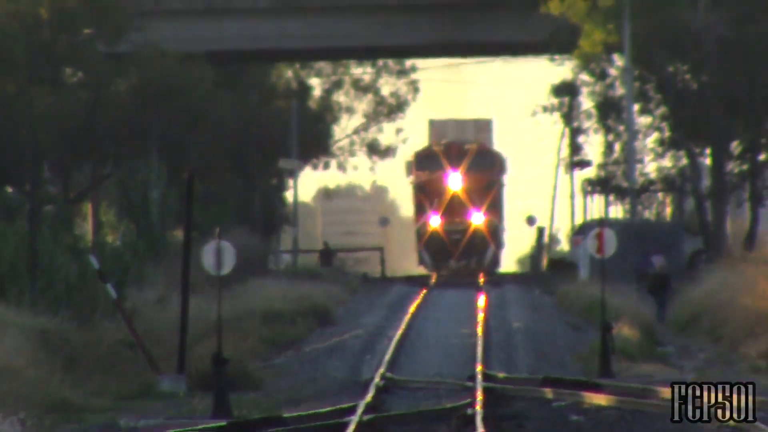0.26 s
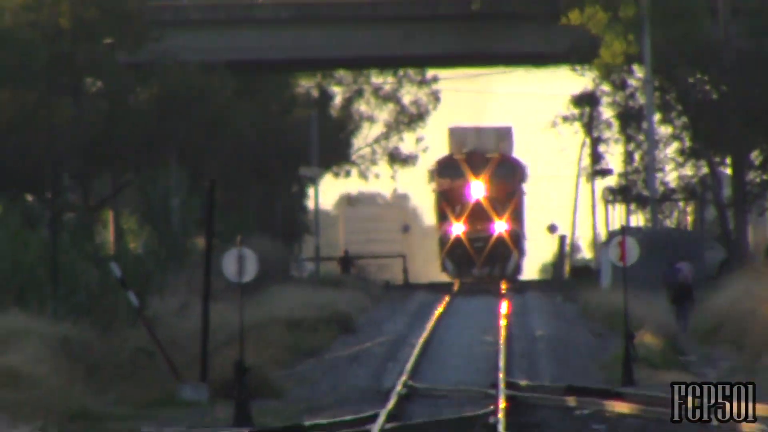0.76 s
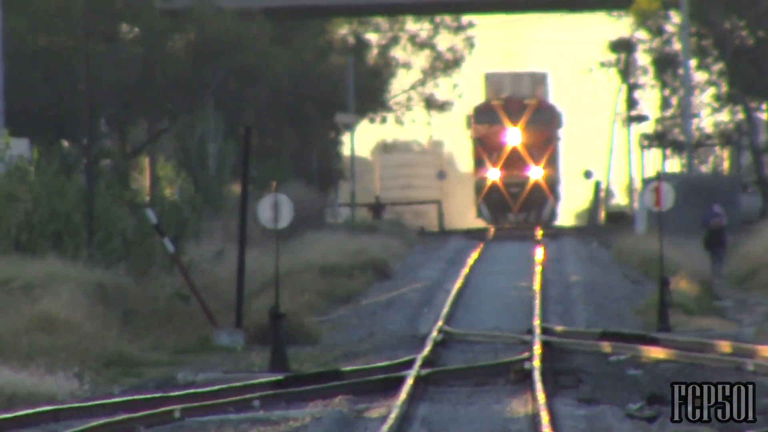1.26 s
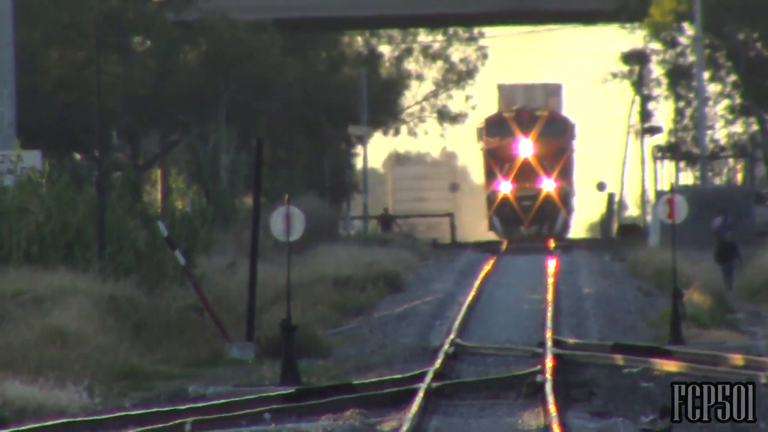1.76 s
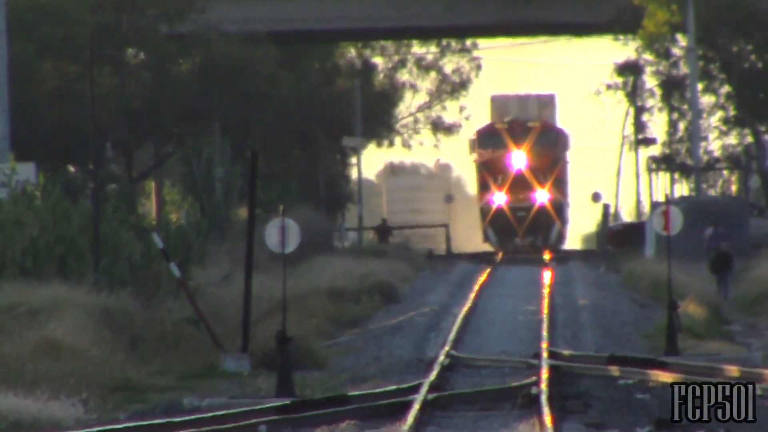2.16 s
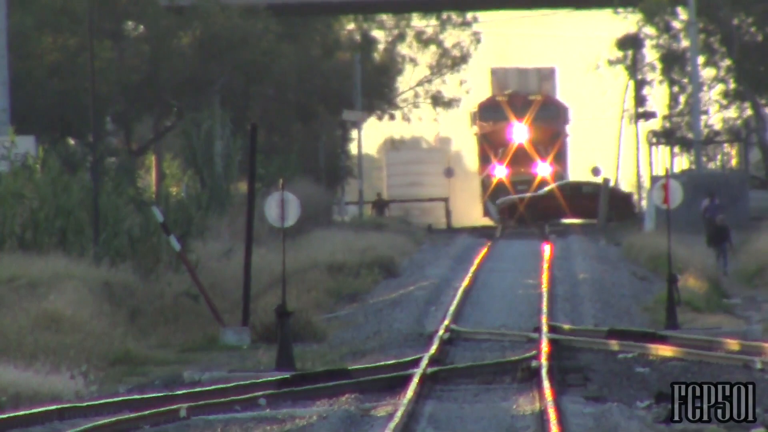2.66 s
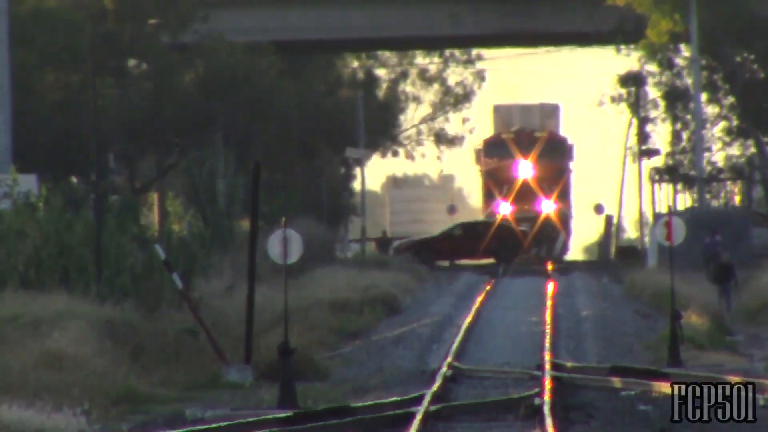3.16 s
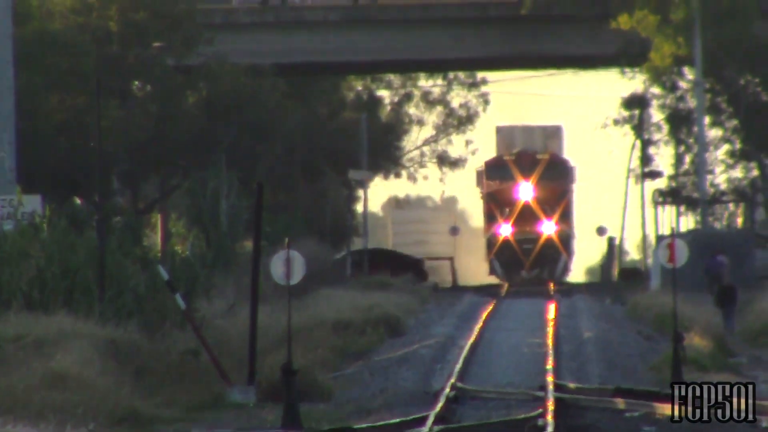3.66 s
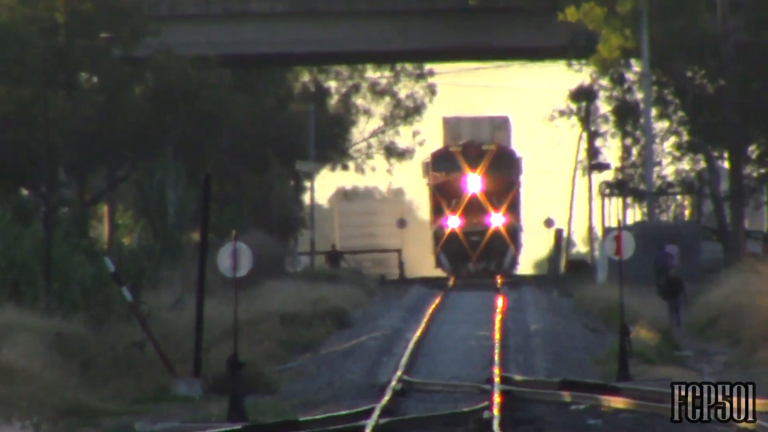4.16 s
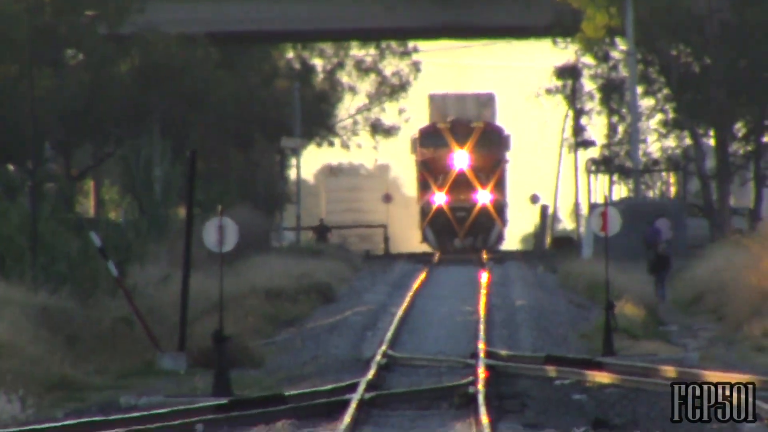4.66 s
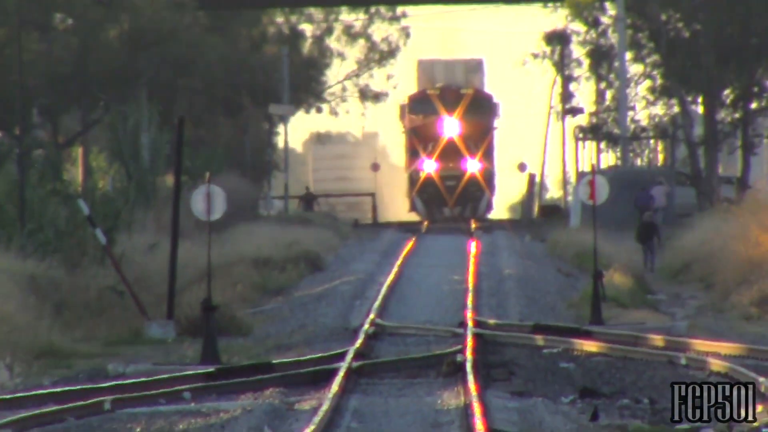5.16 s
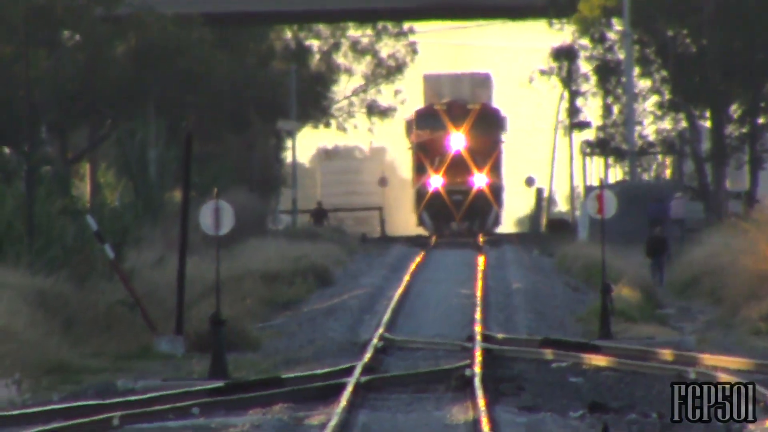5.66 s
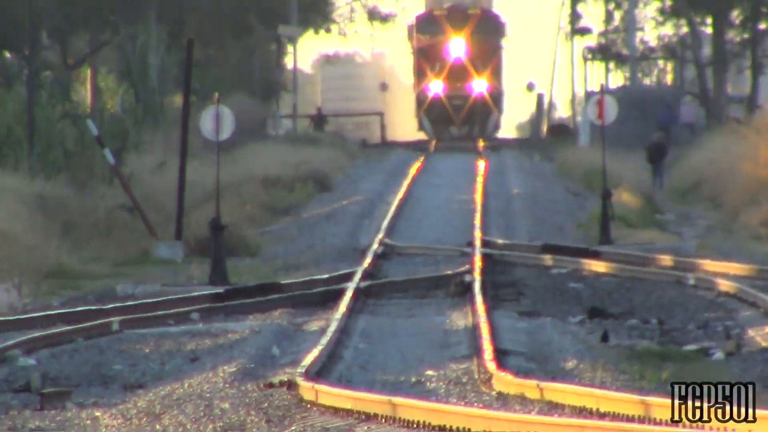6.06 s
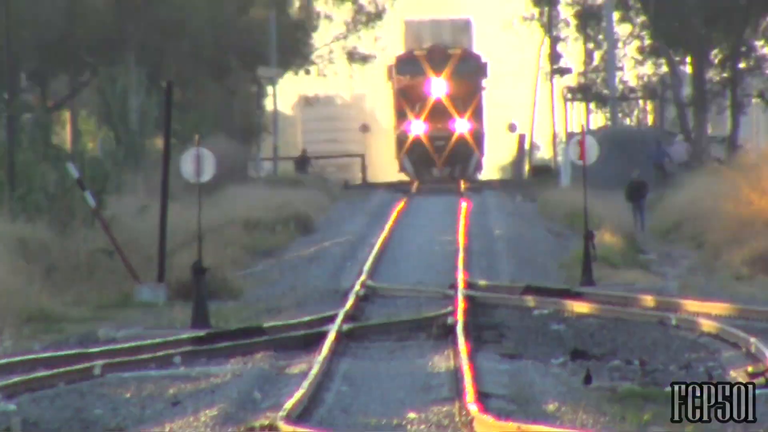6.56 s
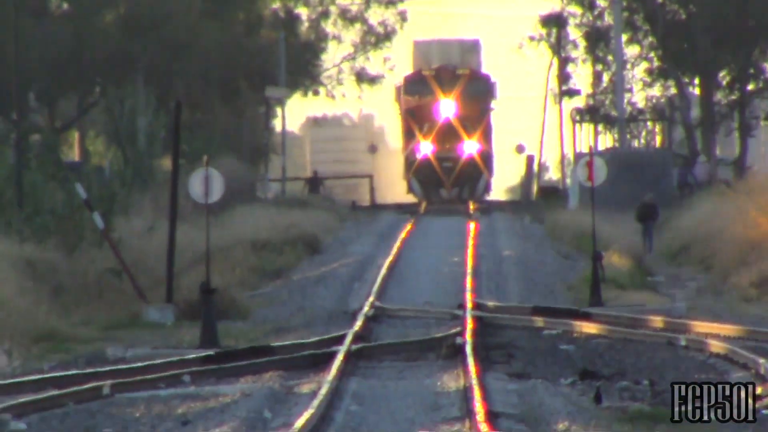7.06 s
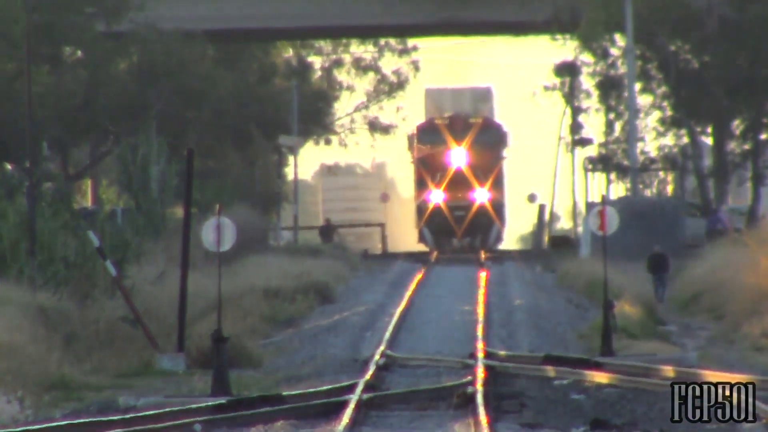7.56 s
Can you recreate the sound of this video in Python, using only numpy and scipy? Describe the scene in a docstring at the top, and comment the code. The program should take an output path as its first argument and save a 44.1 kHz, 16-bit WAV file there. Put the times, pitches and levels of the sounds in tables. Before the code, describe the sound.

A distant diesel locomotive holds a loud five-note air horn chord throughout, sagging and recovering three times, over faint rumble as a car thuds across.

```python
"""A distant diesel locomotive sounds a five-chime air horn; three times the valve eases and the chord sags.
The horn adds up the harmonics of five bells, with side tones, an air blast and a rasp around them.
Its partials fade in and out on their way over ballast and through trees, and trail a diffuse tail.
The diesel is a low noise with an unsteady exhaust note; a car is a climbing engine note and a thud.
The camera adds faint noise: a hiss with a trace of buzz, and small handling ticks."""
import sys
import numpy as np
from scipy import signal
from scipy.fft import rfft, irfft, next_fast_len
from scipy.io import wavfile
from scipy.ndimage import uniform_filter1d, minimum_filter1d, map_coordinates

SR = 44100
rng = np.random.default_rng(int(sys.argv[2]) if len(sys.argv) > 2 else 0)


def master(y):
    """Save y as 16-bit WAV."""
    cut = np.clip(np.atleast_2d(y).T, -1, 1)
    pcm = np.round(cut * 32767)  # scale
    wavfile.write(sys.argv[1], SR, pcm.astype(np.int16))


N = 344421
TIME = np.arange(N) / SR  # seconds
SLOW = np.linspace(0, N / SR, 1600)  # coarser time grid for slow changes, seconds

# The five bells of the horn. Each row: pitch in Hz, list of basic levels in dB of harmonics 1, 2, ..
BELLS = [(277.3, [-32.5, -33.5, -45, -32.5, -43, -53, -43, -48.5, -56, -61.5]),
         (324.3, [-29, -28.5, -27, -32.5, -51.5, -45, -63.5, -52, -54, -69]),
         (385.0, [-25, -12.5, -30, -37.5, -38, -45.5, -54.5, -56, -62.5, -75]),
         (492.5, [-29, -29.5, -48, -41.5, -51, -63.5, -66.5]),
         (528.2, [-23, -54, -32.5, -50.5, -63.5, -71.5])]
# How each bell's pitch bends. One number a bell: relative pitch change at full sag.
BENDS = [-.006, -.009, -.007, -.005, .029]
# The driver eases the valve. Each row: time of lowest pressure in seconds, sag of pressure from 0 to 1,
# loss in dB, closing time in seconds, reopening time in seconds.
EASES = [(1.659, 0.98, 11.5, .33, 0.1), (5.502, 0.95, 7, .23, .14), (6.179, .68, 6.5, .16, .16)]
SETTLE_S = 0.18  # the pitch comes back at its own pace after the valve reopens
STARVED_HZ = 1300
WASH_LOSS = 0.21  # share of the loss that side tones and air blast take

# The sound carries unevenly through the trees, so three ranges of pitch rise and fall.
# Each row: time in seconds, level change in dB.
MIDDLE = [(0, -4.0), (1.1, -2), (1.7, -5), (2.6, -3.5), (3.15, -1), (3.4, -5.0), (4.6, -6), (5.5, -1.5),
          (6.1, 0.0), (6.5, -1), (7.81, -5)]
TREBLE = [(0, -4.5), (0.7, -3.5), (1.3, -6), (2.3, -4), (3.1, -5.5), (3.4, -6), (4.6, -9.5), (5, -1.5),
          (5.5, -4), (6.6, -1.5), (7.4, -1), (7.81, 1.5)]
TOP = [(0, -3), (1.2, -3.5), (2, -5.0), (3.1, -5), (3.4, -4), (4.6, -1.5), (5.2, -4), (5.9, -1.5), (6.4, 2),
       (7, 0.0), (7.81, -9.5)]
MIDDLE_EDGE_HZ, TREBLE_EDGE_HZ = 1500, 2850  # middle gives way to treble, treble to top

# Some partials follow a level of their own instead. Each row: time in seconds, level change in dB.
# The dominant partial, near 770 Hz: the ground reflection swells and cancels it.
LEAD = [(0.0, 0.5), (0.75, -8), (0.85, -19), (0.95, -11), (1.25, -2.5), (1.65, -13.0), (1.75, -4.0),
        (1.95, 1.5), (2.75, 3.5), (2.95, 0.5), (3.15, 3.5), (3.35, -5), (5.15, 2.5), (5.25, -2.0),
        (5.95, -1.5), (6.55, 3), (7.81, -2.5)]
# Fundamentals of the first and third bell, then of the second, fourth and fifth; columns as above.
BASS = [(0, -8.5), (0.8, -5), (2.8, -8.5), (4.4, -8), (6.1, 0.5), (7.81, -5.5)]
SECOND = [(0.0, 0.5), (1.65, -4), (2.55, 0), (3.35, -11.5), (7.05, -0.5), (7.81, -3)]
FOURTH = [(0, -0.5), (1.3, 5), (1.6, -6.5), (4.6, -10.5), (5.1, 2), (5.9, -4), (6.25, -4.5), (6.7, 2.0),
          (7.3, 7), (7.81, 2.5)]
FIFTH = [(0.0, -11.5), (1.05, -2.5), (2.05, 2), (4.35, -3), (6.05, 7), (6.45, 3.5), (6.75, -11.5),
         (7.25, -13), (7.81, -5)]
# The beating pair near 980 Hz, the pair near 1130 Hz, the cluster near 1560 Hz and the partial
# near 1925 Hz; columns as above.
BEAT = [(0, -21), (0.4, -4.5), (1.2, -3.5), (2.1, -11.5), (2.6, 1.5), (4.7, -4.5), (5.8, 3.0), (6.95, 5),
        (7.35, -8), (7.81, 2.5)]
PAIR = [(0, -10.5), (2, -9), (3.3, -5), (5.3, -2), (5.7, 2.5), (6.5, 3.0), (6.9, -3.5), (7.81, -3.0)]
BLARE = [(0.0, 4.5), (1.85, -12), (2.65, -0.5), (3.35, -4), (3.85, 1.5), (4.65, -8), (5.35, 4),
         (5.65, -2.0), (6.45, -1), (7.81, 10.5)]
RING = [(0, 0.5), (0.6, -10), (0.9, 3.5), (1.4, -6.5), (2.2, 0), (3.2, -5), (4.5, -4), (5.1, 2.5),
        (6.55, -9.5), (7, 10.5), (7.25, -8.5), (7.81, 3)]
# Which partial takes which level. Each key: bell counted from 0, harmonic.
OWN_LEVEL = {(2, 2): LEAD, (0, 1): BASS, (2, 1): BASS, (1, 1): SECOND, (3, 1): FOURTH, (4, 1): FIFTH,
             (1, 3): BEAT, (3, 2): BEAT, (0, 4): PAIR, (2, 3): PAIR, (2, 4): BLARE, (4, 3): BLARE,
             (2, 5): RING}
# Single overtones ring out for a moment. Each row: bell counted from 0, harmonic, time of the crest
# in seconds, half length in seconds, lift in dB.
SWELLS = [(2, 7, 0.091, 0.15, 12.5), (1, 4, .8, 0.19, 6), (2, 8, 1.0, 0.44, 10.5), (2, 8, 2.7, 0.53, 5.5),
          (2, 9, 5.3, .1, 15.5), (2, 6, 5.85, 0.21, 11.5), (2, 7, 6.05, 0.13, 10), (2, 9, 6.35, .12, 6.5),
          (1, 4, 6.35, .12, 3), (2, 8, 6.38, 0.15, 8.5), (2, 8, 7.65, 0.32, 8.5)]

# Bells on one air manifold modulate each other and so sound sum and difference tones.
# Each row: pitch in Hz, relative level in dB.
SIDE_TONES = [(479, -41), (510, -38.5), (586, -36.5), (601, -38), (626, -35.5), (640, -35.5), (708, -46),
              (742, -37.5), (803, -37.5), (819, -37.5), (857, -35.5), (870, -41.5), (885, -59.5),
              (913, -45.5), (938, -36.5), (951, -36), (1020, -41), (1093, -41), (1178, -44.5),
              (1419, -61.5), (1684, -57)]
# Colour of the air blast. Each row: frequency in Hz, relative level in dB per Hz.
AIR = [(200, -43.5), (270, -5.5), (430, -12), (520, -4.5), (620, -5.5), (690, -3), (800, 9.5), (945, -4.5),
       (1010, -2.5), (1250, -12), (1600, -37.5)]
# Colour of the rasp. Each row: frequency in Hz, relative level in dB per Hz.
RASP = [(900, -31), (1300, 2), (1600, 3.5), (1800, -4), (2150, -4), (2600, -13), (3100, -17.5),
        (3600, -21.5), (4300, -33.5), (6000, -55.5)]
SIDE_TONES_DB, AIR_DB, RASP_DB = 3.5, -25, -29  # mix of the wash before slow changes

# Colour of the diesel rumble. Each row: frequency in Hz, relative level in dB per Hz.
RUMBLE = [(20, -9), (45, -8), (75, -3), (120, 1.5), (220, 3), (400, 0), (900, -27)]
# Rumble and hiss sink together for a while. Each row: time in seconds, level change in dB.
BACKGROUND = [(0.0, 1.5), (1.05, 1.5), (3.05, 2.5), (3.35, -1.5), (4.65, -3.5), (5.45, 2), (7.81, 2)]
RUMBLE_DB, NOTE_DB, HISS_DB = -41, -48.5, -63.5  # levels before slow changes
NOTE_FALL_DB_PER_S = 0.6  # the exhaust note slowly sinks into the rumble

# The car's engine. Each row: time in seconds, firing rate in Hz, level in dB.
CAR = [(2.2, 60.9, -48.5), (2.6, 67.46, -37.5), (3.0, 69.57, -33.5), (3.4, 72.46, -33.5), (3.8, 76.1, -33),
       (4.2, 73, -50.5)]
# Harmonics of the firing rate that sound. Each row: multiple of the rate, relative level in dB.
CAR_ORDERS = [(3, -9.5), (4, -2), (5, 2), (6, -8)]
# Colour of the wheel thud. Each row: frequency in Hz, relative level in dB per Hz.
THUD = [(45, -4.5), (80, 6.0), (230, 17), (400, -12.5)]

# Colour of the camera's hiss. Each row: frequency in Hz, relative level in dB per Hz.
HISS = [(1500, -14.5), (4000, 1), (6500, -4), (8500, -6.5), (11000, -12), (15500, -22.5)]
# Handling ticks. Each row: start in seconds, level in dB, time to die away by 60 dB in seconds.
TICKS = [(0.0861, -44, .035), (1.5107, -47.5, .1), (1.541, -49, 0.07), (1.6908, -49, 0.087),
         (2.0893, -41, .07), (2.1078, -46, 0.051), (2.2694, -46, 0.034), (2.9101, -41, 0.022),
         (2.954, -53.5, 0.066), (3.9405, -36, 0.0047), (4.7247, -45.5, 0.008), (4.7574, -44, .007)]
# Colour of the ticks. Each row: frequency in Hz, relative level in dB per Hz.
TICK_COLOUR = [(1500, -8.5), (3500, 7), (8000, -6.5), (10500, -20), (16000, -23)]
TOP_HZ = 15700  # the camera's band limit


def amp(db):
    """Turn decibels into a gain."""
    return 10 ** (np.asarray(db) / 20)


def unit(x):
    """Scale to an average strength (rms) of 1."""
    return x / np.sqrt(np.mean(x ** 2) + 1e-20)


def curves(rows, grid=TIME):
    """Join each column after the time by straight lines."""
    s, *columns = np.transpose(rows)
    return [np.interp(grid, s, column) for column in columns]


def every_sample(slow):
    """Stretch a curve from the slow grid to every sample."""
    return np.interp(TIME, SLOW, slow)


def wobble(rate):
    """A smooth random curve on the slow grid, with rate random points a second."""
    return map_coordinates(rng.standard_normal(len(SLOW)), [SLOW * rate], mode="wrap")


def filtered(x, response):
    """Multiply the spectrum of x by a response to frequency."""
    m = next_fast_len(N + SR // 4)  # spare room, so that the end does not wrap onto the start
    spectrum = rfft(x, m) * response(np.fft.rfftfreq(m, 1 / SR))
    return irfft(spectrum, m)[..., :N]


def coloured(x, colour):
    """Filter x through (Hz, dB) points joined on a log frequency axis."""
    f, db = np.transpose(colour)

    def response(hz):
        return amp(np.interp(np.log(hz + 1), np.log(f), db, left=-120, right=-120))
    return filtered(x, response)


def noise(colour, side_db):
    """Stereo noise of rms 1, mostly common to both ears."""
    mid, side = coloured(rng.standard_normal((2, N)), colour)
    side = amp(side_db) * side
    return unit(np.array([mid + side, mid - side]))


def below(hz, edge_hz):
    """1 well below an edge, 0 well above it."""
    return 1 / (1 + (hz / edge_hz) ** 14)


def horn():
    """The chord with its side tones, air blast and rasp, all fed by one valve."""
    sag, loss_db = easing()
    phases = [diaphragm(pitch_hz, bend, sag) for (pitch_hz, _), bend in zip(BELLS, BENDS)]
    (middle_db,), (treble_db,), (top_db,) = curves(MIDDLE), curves(TREBLE), curves(TOP)
    wash = amp(SIDE_TONES_DB) * side_tones(sag) + amp(AIR_DB) * noise(AIR, side_db=-16)
    wash = amp(middle_db - WASH_LOSS * loss_db) * wash
    grit = rasp(phases, count=7)
    low_grit = filtered(grit, lambda hz: below(hz, TREBLE_EDGE_HZ))
    grit = amp(treble_db) * low_grit + amp(top_db) * (grit - low_grit)
    loud_chord = steepened(chord(phases, loss_db), lead=0.00006)
    return loud_chord + wash + amp(RASP_DB - loss_db) * grit


def easing():
    """Sag of the air pressure (0-1) and the loudness that it costs (dB), sample by sample."""
    sag, loss_db = np.zeros(N), np.zeros(N)
    for s, depth, full_loss_db, closing_s, reopening_s in EASES:
        def dip(after_s):
            width_s = np.where(TIME < s, closing_s, after_s)
            return np.exp(-((TIME - s) / width_s) ** 2)
        sag += depth * dip(SETTLE_S)
        loss_db += full_loss_db * dip(reopening_s) ** 2  # squared: a briefer dip than the sag
    return sag, loss_db


def diaphragm(pitch_hz, bend, sag, jitter=0.0041, jitter_hz=70, drift=0.0004):
    """Phase of one bell: it follows the air pressure, and turbulence jitters its cycles."""
    hz = pitch_hz * (1 + bend * sag + drift * every_sample(wobble(5)))
    shake = unit(filtered(rng.standard_normal(N), lambda f: 1 / (1 + (f / jitter_hz) ** 2)))
    roughness = jitter * (1 + 0.83 * sag)  # radians; a starved diaphragm runs rough
    return 2 * np.pi * np.cumsum(hz) / SR + roughness * shake


def chord(phases, loss_db, fade_db=4.06, fade_db_per_octave=-0.4, flicker_db=1.84, scatter=0.12,
          waver_per_octave=0.22, lead_waver=0.3, low_waver=0.65):
    """All harmonics of all bells; each arrives by several paths and so wavers in level and phase."""
    loss_db = np.interp(SLOW, TIME, loss_db)
    (middle,), (treble,), (top,) = curves(MIDDLE, SLOW), curves(TREBLE, SLOW), curves(TOP, SLOW)
    out = np.zeros(N)
    for bell, (pitch_hz, harmonics) in enumerate(BELLS):
        for k, db in enumerate(harmonics, 1):
            hz = k * pitch_hz
            octaves = np.log2(hz / BELLS[0][0])
            own = OWN_LEVEL.get((bell, k))
            if own:
                carry = curves(own, SLOW)[0]
            else:
                register = top + below(hz, TREBLE_EDGE_HZ) * (treble - top)
                register = register + below(hz, MIDDLE_EDGE_HZ) * (middle - treble)
                carry = register + (fade_db + fade_db_per_octave * octaves) * wobble(2.0)
            starved_db = loss_db * min(1, np.sqrt(hz / STARVED_HZ))
            level = db + carry + swell(bell, k) - starved_db
            # short waves scatter more; the dominant partial arrives almost directly
            waver = lead_waver if own is LEAD else low_waver + waver_per_octave * octaves
            gain = np.sqrt(2) * amp(level + flicker_db * waver * wobble(16))
            turn = rng.uniform(0, 2 * np.pi) + scatter * waver * (wobble(13) + 2 * wobble(3))
            out += every_sample(gain) * np.sin(k * phases[bell] + every_sample(turn))
    return out


def swell(bell, harmonic):
    """Lift (dB) of one overtone that rings out, on the slow grid."""
    return sum(db * np.exp(-((SLOW - s) / half_s) ** 2)
               for b, k, s, half_s, db in SWELLS if (b, k) == (bell, harmonic))


def steepened(x, lead):
    """Crests of a very loud wave outrun its troughs (lead s per unit pressure), which adds sum tones."""
    return map_coordinates(x, [np.arange(N) + lead * SR * x], mode="nearest")


def side_tones(sag, bend=0.008, fade_db=5.0, scatter=0.65):
    """Each side tone glides a little, up or down at random, as the pressure sags, and fades at random."""
    sagged_s = np.cumsum(sag) / SR
    out = np.zeros(N)
    for hz, db in SIDE_TONES:
        phase = 2 * np.pi * hz * (TIME + bend * rng.standard_normal() * sagged_s)
        turn = rng.uniform(0, 2 * np.pi) + scatter * (wobble(11) + 2 * wobble(3))
        gain = amp(db + fade_db * wobble(2.5))
        out += every_sample(gain) * np.sin(phase + every_sample(turn))
    return out


def rasp(phases, count, slope=0.15):
    """Harmonics of all pairs of bells mix into a dense thicket of tones, with a little air noise."""
    def turn():
        return rng.uniform(0, 2 * np.pi) + 0.35 * every_sample(wobble(3))

    def buzzing(phase):
        return sum(np.sin(k * phase + turn()) / k ** slope for k in range(1, count + 1))
    waves = np.array([buzzing(phase) for phase in phases])
    # the square of the sum, less each bell's own square, leaves the products of pairs
    products = waves.sum(0) ** 2 - (waves ** 2).sum(0)
    return unit(unit(coloured(products, RASP)) + amp(-8) * noise(RASP, side_db=-8))


def trackside(x, t60=1.0):
    """Trees and a bridge return a diffuse tail, different in each ear; it fades 60 dB in t60 seconds."""
    t = np.arange(SR) / SR
    tail = rng.standard_normal((2, SR)) * amp(-60 * t / t60) * (1 - np.exp(-t / 0.064))
    tail = tail / np.linalg.norm(tail[0])
    return amp(-25) * signal.fftconvolve(x, tail, axes=1)[:, :N]


def diesel(note_hz=112.2, width_hz=3.5, surge_db=1.5, flutter_db=1.6):
    """Broad rumble with an exhaust note that is unsteady in pitch and level."""
    background_db, = curves(BACKGROUND)
    rumble = noise(RUMBLE, side_db=-9.5)
    phase = 2 * np.pi * np.cumsum(note_hz + width_hz * every_sample(wobble(17))) / SR
    unsteady_db = every_sample(surge_db * wobble(4) + flutter_db * wobble(32))
    note = amp(NOTE_DB - NOTE_FALL_DB_PER_S * TIME + unsteady_db) * unit(np.sin(phase))
    return amp(background_db) * (note + amp(RUMBLE_DB) * rumble)


def car(bump_s=2.925, bump_db=-27.0, bump_t60=0.48, waver=0.0018):
    """An engine note climbs as the car pulls over the crossing; its wheels thud on the rails."""
    firing_hz, db = curves(CAR)
    phase = 2 * np.pi * np.cumsum(firing_hz * (1 + waver * every_sample(wobble(25)))) / SR
    engine = unit(sum(amp(level) * np.sin(k * phase) for k, level in CAR_ORDERS))
    age = np.maximum(TIME - bump_s, 0)
    thud = amp(bump_db - 60 * age / bump_t60) * (1 - np.exp(-age / 0.0049))  # quick rise, slow fall
    running = (TIME > CAR[0][0]) & (TIME < CAR[-1][0])
    return running * amp(db) * engine + thud * noise(THUD, side_db=-9.5)


def camera(buzz_db=4.5, buzz_hz=60):
    """Faint hiss that pulses with a trace of buzz, and small handling ticks of fading noise."""
    hiss_db = HISS_DB + curves(BACKGROUND)[0]
    buzz = np.cos(np.pi * buzz_hz * TIME) ** 8  # narrow pulses, buzz_hz a second
    ticks = sum(amp(db - 60 * np.maximum(TIME - s, 0) / t60) * (TIME >= s) for s, db, t60 in TICKS)
    hiss = amp(hiss_db + buzz_db * buzz) * noise(HISS, side_db=-12)
    return hiss + ticks * noise(TICK_COLOUR, side_db=-12.0)


def scene():
    """Horn, diesel and car lie ahead, a little stronger on the right; the camera adds its own noise."""
    blast = horn()
    ahead = blast + trackside(blast) + diesel() + car()
    return ahead * amp([[-0.55], [0.55]]) + camera()


def record(dry):
    """The camera's limiter eases the highest crests; nothing is kept above its band limit."""
    needed = np.minimum(1, 0.93 / (np.abs(dry).max(0) + 1e-9))
    gain = minimum_filter1d(needed, size=801)
    gain = uniform_filter1d(uniform_filter1d(gain, size=401), size=401)
    edges = np.minimum(1, np.minimum(TIME, TIME[-1] - TIME) / 0.004)  # short fade at both ends
    return filtered(dry * gain * edges, lambda hz: hz < TOP_HZ)


dry = scene()
out = record(dry)
master(out)
```